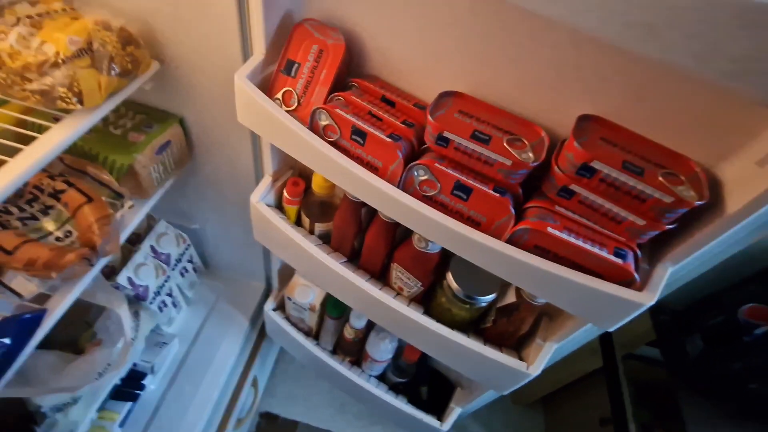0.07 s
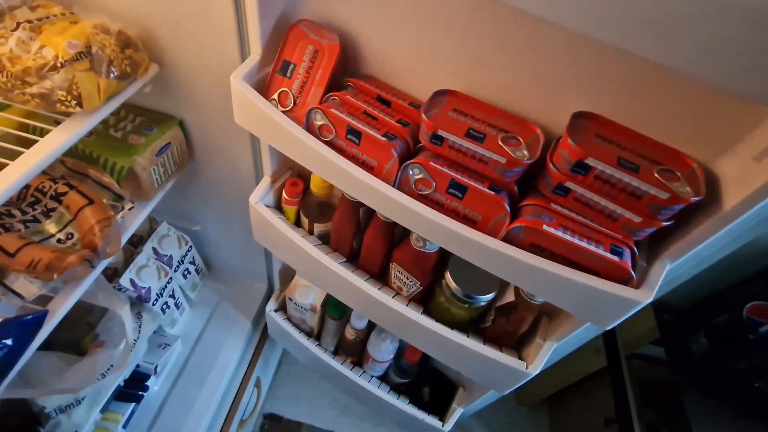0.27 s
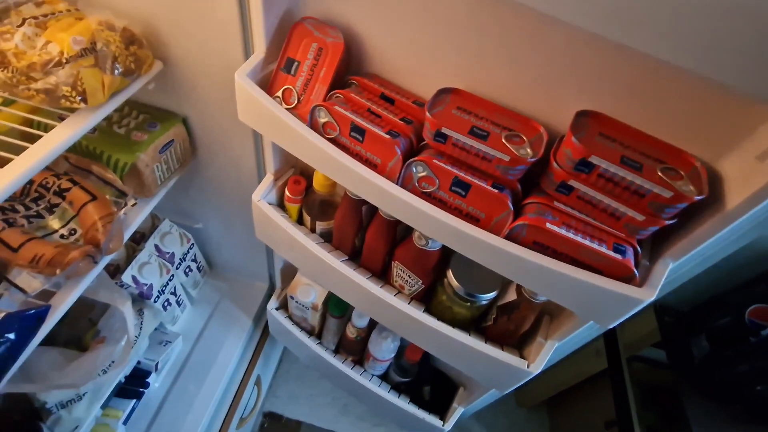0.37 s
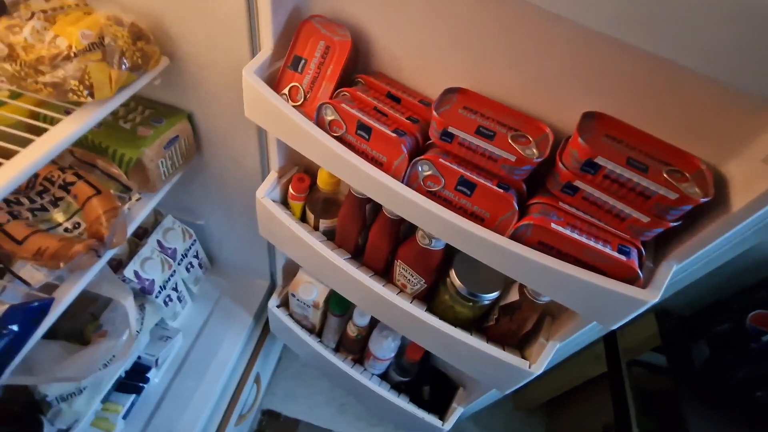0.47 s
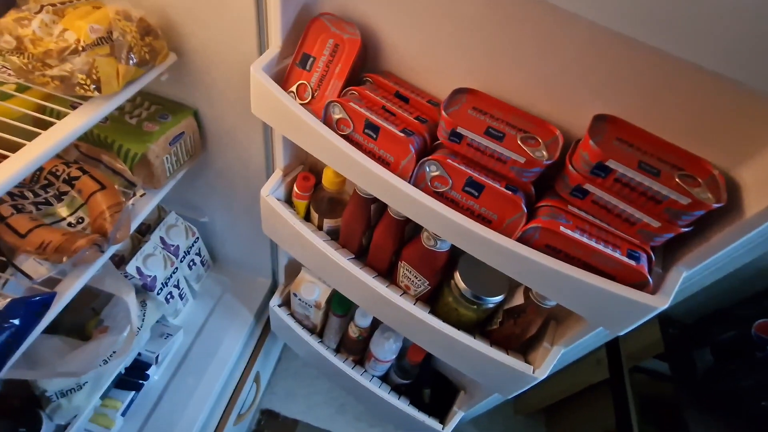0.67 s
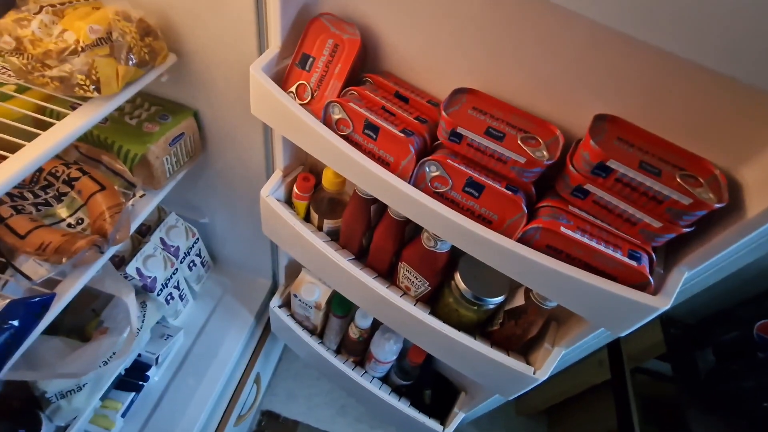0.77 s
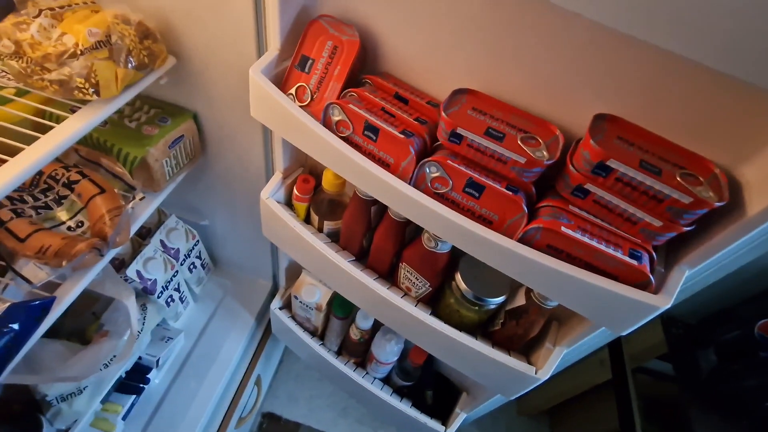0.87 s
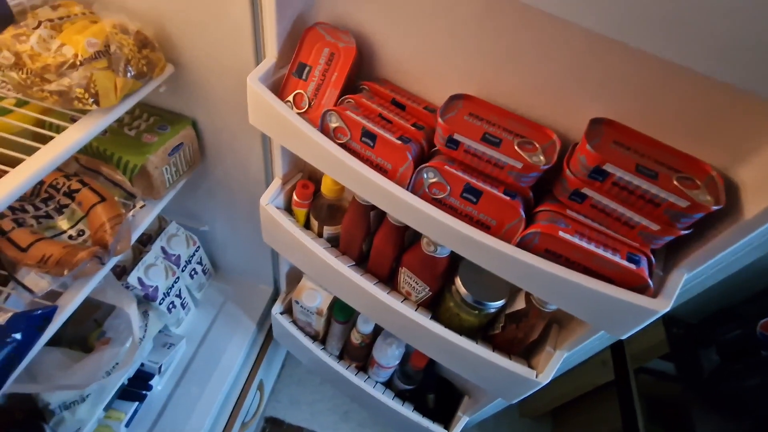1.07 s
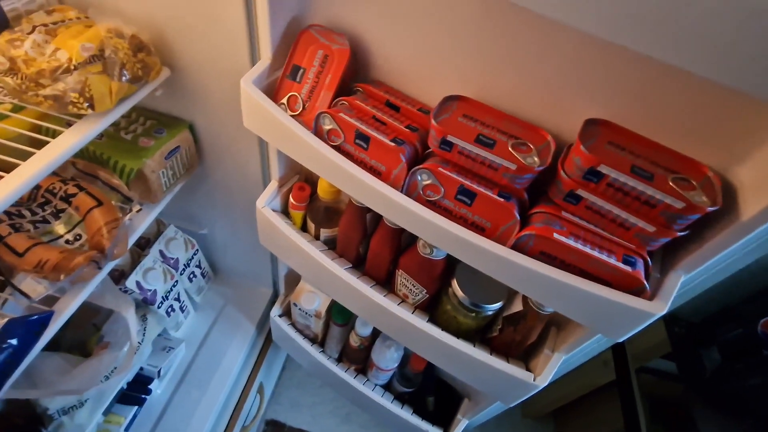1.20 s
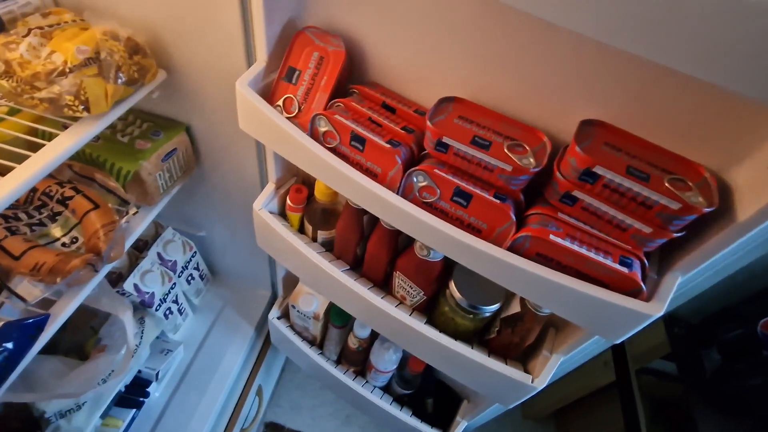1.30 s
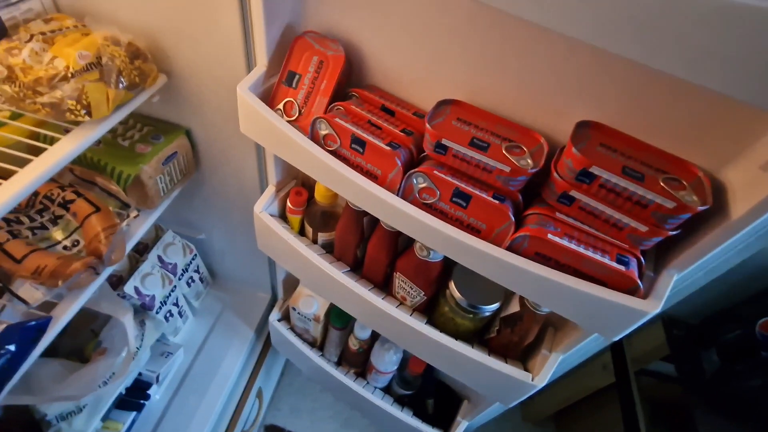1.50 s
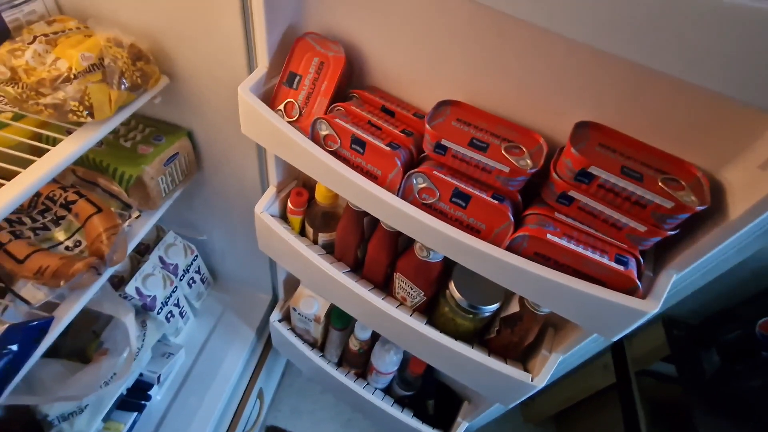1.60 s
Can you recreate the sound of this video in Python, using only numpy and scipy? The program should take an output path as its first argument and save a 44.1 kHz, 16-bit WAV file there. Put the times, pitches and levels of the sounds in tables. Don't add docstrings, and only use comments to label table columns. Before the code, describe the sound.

Wrapped metal tins scrape, crackle and knock as a hand pushes them into a plastic fridge door shelf.

```python
import sys
import numpy as np
from scipy import signal
from scipy.fft import rfft, irfft
from scipy.io import wavfile
from scipy.ndimage import uniform_filter1d

SR = 44100
rng = np.random.default_rng(int(sys.argv[2]) if len(sys.argv) > 2 else 0)


def voltage_ratio(decibels):
    exponent = np.asarray(decibels, float) / 20
    return 10 ** exponent


def persist_wave(psi):
    counts = np.round(np.clip(psi, -1, 1) * 32767).astype(np.int16)
    wavfile.write(sys.argv[1], SR, np.atleast_2d(counts).T)


N = 72765
T = np.arange(N) / SR
HZ = np.maximum(np.fft.rfftfreq(N, 1 / SR), 10)


def unit(x):
    return x / np.sqrt(np.mean(x ** 2))


def across(table):
    a = np.array(table, float)
    return np.interp(np.log(HZ), np.log(a[:, 0]), a[:, 1])


def colour(x, table):
    edge = 1 / (1 + (table[0][0] / HZ) ** 6)
    return irfft(rfft(x) * voltage_ratio(across(table)) * edge, N)


def band(x, hz, width_hz):
    q = max(hz / width_hz, .3)
    return signal.lfilter(*signal.iirpeak(min(hz, .42 * SR), q, fs=SR), x)


def walk(rate_hz):
    hold = int(SR / rate_hz)
    steps = np.repeat(rng.standard_normal(N // 100), hold)[:N]
    return 1.23 * uniform_filter1d(steps, hold)


# f/Hz, likeness/0-1
LIKENESS = [(60, 0.96), (300, 0.74), (700, 0.83), (1500, 0.64), (4000, 0.01), (15000, 0)]


def pair():
    like = np.clip(across(LIKENESS), 0, 1)
    a, b = rfft(rng.standard_normal((2, N)))
    return irfft(np.array([a, like * a + np.sqrt(1 - like ** 2) * b]), N)


# f/Hz, level/dB
FRIDGE = [(25, -30), (110, -45), (340, -39), (800, -16.5), (950, -29), (2300, -21.5), (2600, -29.5),
          (4500, -31), (4900, -45), (8500, -41.5), (9500, -51), (16000, -50)]
# f/Hz, level/dB, centre t/s, half length/s
HUM = [
    (399, -57, .045, .04),
    (380, -57, .14, .018),
    (1604, -57, .045, .014),
    (1610, -62, .09, .02),
]
FRIDGE_DB, LATE_DROP_DB = -61, -8


def fridge():
    hum = 0
    for hz, db, s, half_s in HUM:
        swell = np.exp(-((T - s) / half_s) ** 2)
        hum = hum + voltage_ratio(db) * swell * np.sin(2 * np.pi * hz * T)
    fan = unit(colour(pair(), FRIDGE)) * voltage_ratio(FRIDGE_DB + walk(20))
    return (fan + hum) * voltage_ratio(np.interp(T, [1.1, 1.45], [0, LATE_DROP_DB]))


# t/s, level/dB
SWAY = [
    (.785, -83),
    (.805, -52),
    (.9, -54),
    (1.0, -45),
    (1.1, -46.5),
    (1.3, -50.5),
    (1.45, -54),
    (1.53, -72),
    (1.65, -60),
]
MOTOR_DB, MOTOR_HZ = -68.5, 75


def sway():
    swing = unit(band(band(pair(), 44.0, 120.0), 44.0, 120.0))
    motor = unit(band(band(pair(), MOTOR_HZ, 120.), MOTOR_HZ, 120.))
    return swing * voltage_ratio(np.interp(T, *np.array(SWAY).T)) + voltage_ratio(MOTOR_DB) * motor


# f/Hz, width/Hz, level/dB
DOOR = [(273, 210, 1.5), (393.5, 53, -1.5), (472.3, 52, 0)]
# t/s, level/dB
LOAD = [(.17, -61), (.2, -45), (.27, -39), (.45, -58.5), (.55, -54), (.614, -42), (.7, -43.5), (.72, -49),
        (.79, -41), (.89, -41.5), (.99, -44.5), (1.05, -52.5), (1.1, -48), (1.134, -59), (1.162, -47),
        (1.18, -59), (1.3, -52.5), (1.4, -70)]


def door():
    noise, body = pair(), 0
    for hz, width_hz, db in DOOR:
        ring = unit(band(band(noise, hz, width_hz), hz, 2 * width_hz))
        body = body + voltage_ratio(db + 2.6 * walk(25.03)) * ring
    return unit(body) * voltage_ratio(np.interp(T, *np.array(LOAD).T))


# t/s, effort/dB, weight on shelf/dB
PUSHES = [
    [(0.174, -61, 14), (0.188, -43, 2), (0.217, -28, -5.5), (0.241, -28.5, 0.5), (0.345, -35.5, -5),
     (0.385, -28, -2), (0.44, -35.5, -3)],
    [(0.46, -32.5, -3.5), (0.54, -34, -3.5), (0.564, -37, 1), (0.596, -28.5, -6.5), (0.606, -31, -1.5),
     (0.626, -27.5, -4), (0.678, -37.5, -2.5), (0.7, -28.5, -5.5)],
    [(0.72, -37.5, -5), (0.742, -32.5, 0.5), (0.84, -25.5, -2.5), (0.9, -33, -3.5)],
    [(1.365, -44, -4), (1.445, -44, 1.5), (1.465, -45.5, -7), (1.487, -48, -1), (1.55, -57, -0.5),
     (1.565, -57, 5.5), (1.587, -56.5, -1), (1.619, -69, 2.5), (1.635, -48, 2), (1.65, -34, 0)],
]
# t/s, effort/dB, weight/dB
LULL = [
    (.93, -33.5, -4.5),
    (.99, -35.5, -3),
    (1.035, -42, -6),
    (1.07, -54.5, -2),
    (1.10, -52.5, -2),
    (1.125, -53.5, -3),
    (1.14, -59, 0),
    (1.165, -52.5, -3),
    (1.19, -50, -2.5),
]
# t/s, effort/dB, weight/dB
SHOVE = [
    (1.199, -45, -2.5),
    (1.208, -31, 2),
    (1.232, -33.5, -3.5),
    (1.256, -29, -3.5),
    (1.283, -32.5, -2.5),
    (1.301, -33.5, -9),
    (1.325, -39.5, -1.5),
    (1.35, -49.5, 0),
]


def hand(col):
    rows = np.vstack(PUSHES + [LULL, SHOVE])
    rows = rows[np.argsort(rows[:, 0])]
    return np.interp(T, rows[:, 0], rows[:, col], left=-120)


SPARSE_BELOW_DB, EVEN_S = -34, 0.0295


def grains(rate_hz, spread_db, length_s):
    u, e = rng.random(N), rng.exponential(size=N)
    dense = np.clip(voltage_ratio(0.65 * (hand(col=1) - SPARSE_BELOW_DB)), .12, 1)
    size = voltage_ratio(2 * spread_db * np.minimum(e, 3.5))
    pops = (u < dense * rate_hz / SR) * size / dense
    power = signal.lfilter([1], [1, -np.exp(-2 / (length_s * SR))], pops)
    local = uniform_filter1d(power, int(EVEN_S * SR))
    return np.sqrt(power / (local + 0.11 * power.mean()))


# f/Hz, level/dB
FILM = [(2500, 6.5), (3240, -1), (4500, 1), (7400, 3.5), (9000, 1.5), (10500, -4.5), (12000, 1),
        (15600, 1.5)]
CREASES_PER_S, CREASE_SPREAD_DB, CREASE_S = 3600, 3.1, .001
FILM_DB, FLUTTER_DB, FLUTTER_HZ = 3.5, 0.7, 60.36


def film():
    out, flutter_db = 0, FLUTTER_DB * walk(FLUTTER_HZ)
    for hz in (3200., 5500., 9000., 14000.):
        pops = pair() * grains(CREASES_PER_S / 4, CREASE_SPREAD_DB, CREASE_S)
        out = out + band(pops, hz, hz * 1.46) / np.sqrt(hz)
    shared = pair() * grains(CREASES_PER_S / 2, CREASE_SPREAD_DB, CREASE_S)
    creases = unit(colour(0.75 * unit(out) + shared, FILM))
    return creases * voltage_ratio(hand(col=1) + FILM_DB + flutter_db)


# f/Hz, level/dB
SHELF = [(71, -63), (120, -12.5), (332, -10.5), (382, -5.5), (559, -3), (942, -1.5), (1200, -11),
         (1400, 7.5), (3500, -5.5), (4550, -1), (7700, -120)]
# f/Hz, width/Hz, level/dB
TINS = [(537, 330, -9), (1200, 150, 7.5), (1400, 74, -17), (1814, 94, -6.5), (2020, 130, 3), (2400, 200, 0)]
SLIPS_PER_S, SLIP_SPREAD_DB, SLIP_S = 780, -1.5, 0.0047
SHELF_DB, TINS_DB, RUMBLE_DB = -1, -3.5, -16.5


def scrape():
    slips = pair() * grains(SLIPS_PER_S, SLIP_SPREAD_DB, SLIP_S)
    tins = 0
    for hz, width_hz, db in TINS:
        ring = band(slips, hz, width_hz) / np.sqrt(width_hz)
        tins = tins + voltage_ratio(db + 2.05 * walk(30.12)) * ring
    rumble = band(band(pair(), 80.0, 190.0), 118.0, 220.0) * voltage_ratio(0.87 * walk(15))
    sound = unit(colour(slips, SHELF)) + voltage_ratio(TINS_DB) * unit(tins) + voltage_ratio(RUMBLE_DB) * unit(rumble)
    return sound * voltage_ratio(hand(col=1) + hand(col=2) + SHELF_DB)


# t/s, peak level/dB, f/Hz
THUDS = [(0.187, -35.5, 161), (0.282, -38.5, 93), (0.377, -38, 115), (0.729, -42, 138), (0.79, -43, 45),
         (0.816, -41, 173), (0.85, -38, 109), (0.929, -34, 172), (0.953, -30, 75), (0.99, -35, 110),
         (1.033, -29.5, 90), (1.071, -33, 49.6), (1.119, -55, 45), (1.155, -43, 128), (1.196, -42, 59.5),
         (1.258, -35, 55.6), (1.3, -31.5, 80), (1.39, -36, 68.3), (1.418, -34, 100.3), (1.457, -42, 59),
         (1.486, -44, 39.8), (1.559, -56, 37.7), (1.64, -43, 61)]
THUD_DB, THUD_NOISE_DB = -6, -10.5
THUD_RISE_S, THUD_FALL_S = 0.0061, 0.019


def thuds():
    out, noise = 0, pair()
    chance = rng.random((len(THUDS), 2)) * [2 * np.pi, 1.2]
    for (s, db, hz), (phase, skew) in zip(THUDS, chance):
        t = np.maximum(T - s + 0.0036, 0)
        shape = (1 - np.exp(-t / THUD_RISE_S)) * np.exp(-t / THUD_FALL_S) * 2
        port_phase = np.array([[1.6 * skew - .6], [0]])
        swing = np.sin(2 * np.pi * hz * t + phase + port_phase)
        shake = unit(band(band(noise, 1.17 * hz, 5.1 * hz), 0.53 * hz, 5. * hz))
        out = out + voltage_ratio(db + THUD_DB) * shape * (swing + 0.37 * voltage_ratio(THUD_NOISE_DB) * shake)
    return out


# t/s, peak level/dB, centre f/Hz, shelf tap level/dB
SNAPS = [(0.1923, -24, 8130, -20), (0.2086, -21, 2570, -42), (0.3716, -12, 7800, -20),
         (0.453, -16.5, 12000, -23), (0.5305, -15, 12000, -15), (1.0504, -45, 3740, -2),
         (1.0721, -32, 13000, -25), (1.0778, -30.5, 6020, -2), (1.0851, -23.5, 10000, -13),
         (1.0985, -24, 9500, -9), (1.1124, -34, 8200, -17), (1.14, -28, 12100, -11),
         (1.1516, -30, 3640, -1), (1.1672, -28.5, 4250, -6), (1.176, -29.5, 12500, -15),
         (1.189, -21, 7700, -4), (1.2113, -14, 9000, -6.5), (1.2493, -20.5, 7540, -1),
         (1.29, -13.5, 13600, -7), (1.332, -14.5, 4770, -11.5), (1.3858, -20.5, 12000, -22),
         (1.4293, -20.5, 8100, -15), (1.4384, -15, 8600, -23), (1.454, -29.5, 6400, -2),
         (1.491, -21, 8300, -13), (1.517, -25.5, 7900, -22), (1.5531, -25, 7540, -5.5),
         (1.5766, -36.5, 2500, 5.5), (1.629, -24, 7100, -9), (1.636, -24.5, 4760, -17),
         (0.183, -23, 6000, -11), (0.232, -10, 7160, -19), (0.2845, -25, 11000, -35),
         (0.295, -18, 9000, -12), (0.357, -32, 9000, -24), (0.829, -19.5, 9050, 0),
         (0.999, -21, 13000, -27), (1.032, -29, 6500, -20), (1.0895, -39, 9050, -7),
         (1.129, -43, 5000, -11), (1.196, -24, 12500, -18), (1.435, -24.5, 12000, -31),
         (1.537, -36, 6000, -17), (1.5634, -34, 10000, -8), (1.5765, -32, 13000, -24),
         (1.5806, -34.5, 6540, -8), (1.6465, -19, 6000, -9)]
SNAP_S, SNAP_RISE_S, SNAP_LAG_S, SNAP_TAIL_S = .0013, .0004, .0011, 0.0064
SNAP_DB, SNAP_TAIL_DB, SNAP_BODY_DB = -6.5, -15.5, 0


def snaps():
    out, t = np.zeros((2, N + 4000)), T[:4000]
    noise = unit(colour(pair(), FILM))
    low = unit(colour(pair(), SHELF))
    rise = np.minimum(t / SNAP_RISE_S, 1)
    tail = voltage_ratio(SNAP_TAIL_DB) * np.exp(-t / SNAP_TAIL_S)
    for s, db, hz, tap_db in SNAPS:
        i = int((s + SNAP_LAG_S) * SR)
        j = min(i, N - 4000)
        hiss = noise[:, j:j + 4000]
        crack = 1.99 * band(hiss, hz, 0.93 * hz) * np.exp(-t / SNAP_S)
        tap = low[:, j:j + 4000] * (np.exp(-t / (2.1 * SNAP_S)) + tail)
        sound = crack + tail * hiss + voltage_ratio(SNAP_BODY_DB + tap_db) * tap
        out[:, i:i + 4000] += voltage_ratio(db + SNAP_DB) * rise * sound
    return out[:, :N]


# t/s, peak level/dB, f/Hz
KNOCKS = [(0.185, -41, 1430), (0.227, -34, 1530), (0.238, -22, 1400), (0.254, -29.5, 1470),
          (0.262, -21, 1280), (0.292, -23.5, 1350), (0.302, -24, 1280), (0.317, -24, 1450),
          (0.337, -24, 1450), (0.363, -19.5, 1730), (0.379, -21.5, 1270), (0.397, -33, 1700),
          (0.529, -35, 1730), (0.556, -23, 1700), (0.574, -25, 1730), (0.593, -33.5, 1260),
          (0.693, -33, 1740), (0.725, -23, 1390), (0.776, -24, 1200), (0.798, -23.5, 1200),
          (0.82, -29, 1480), (0.856, -31, 1400), (0.907, -25, 2400), (1.462, -38, 1400)]
KNOCK_S, KNOCK_WIDTH, KNOCK_DB = 0.0042, 0.41, -5


def knocks():
    out, noise = 0, pair()
    for s, db, hz in KNOCKS:
        t = np.maximum(T - s, 0) / KNOCK_S
        ring = unit(band(noise, hz, KNOCK_WIDTH * hz))
        out = out + voltage_ratio(db + KNOCK_DB) * t * np.exp(1 - t) * ring
    return out


# t/s, peak level/dB, f/Hz
PINGS = [
    (1.048, -34, 1285),
    (1.332, -28, 2400),
    (1.454, -31, 1440),
]
PING_S = 0.002


def pings():
    out = 0
    for s, db, hz in PINGS:
        t = np.maximum(T - s, 0)
        out = out + voltage_ratio(db) * 2 * t / PING_S * np.exp(-t / PING_S) * np.sin(2 * np.pi * hz * t)
    return out


ROOM_DB, ROOM_T60_S, ROOM_TREBLE_T60_S = -9, .13, .06


def kitchen(near):
    t = T[:12000]
    echo = rng.standard_normal((2, 12000)) * (t > .002)
    dull = uniform_filter1d(echo, size=7)
    tail = dull * voltage_ratio(-60 * t / ROOM_T60_S) + (echo - dull) * voltage_ratio(-60 * t / ROOM_TREBLE_T60_S)
    tail = voltage_ratio(ROOM_DB) * tail / np.sqrt(np.sum(tail ** 2) / 2)
    return signal.fftconvolve(near, tail, axes=1)[:, :N]


def scene():
    near = film() + scrape() + snaps() + pings()
    return near + kitchen(near) + thuds() + fridge() + knocks() + door() + sway()


def roll_off(x):
    return signal.sosfilt(signal.butter(12, 17010, fs=SR, output="sos"), x)


# f/Hz, left minus right level/dB
PORTS = [(60, -4), (300, -1.5), (600, -5), (1300, 7), (2200, 4), (4000, -5.5), (8000, -0.5), (15000, -1.2)]
PORT_LAG_S, TOP_HZ = 6.2 / 44100, 15850


def record(dry):
    half = voltage_ratio(across(PORTS) / 2)
    lag = np.exp(-2j * np.pi * HZ * PORT_LAG_S)
    fade = np.minimum((T[::-1] + 1e-4) / .002, 1)
    x = irfft(rfft(dry * fade) * np.array([half * lag, 1 / half]), N)
    x = signal.sosfilt(signal.ellip(12, .3, 50, TOP_HZ, fs=SR, output="sos"), x)
    return roll_off(x)


dry = scene()
out = record(dry)
persist_wave(out)
```